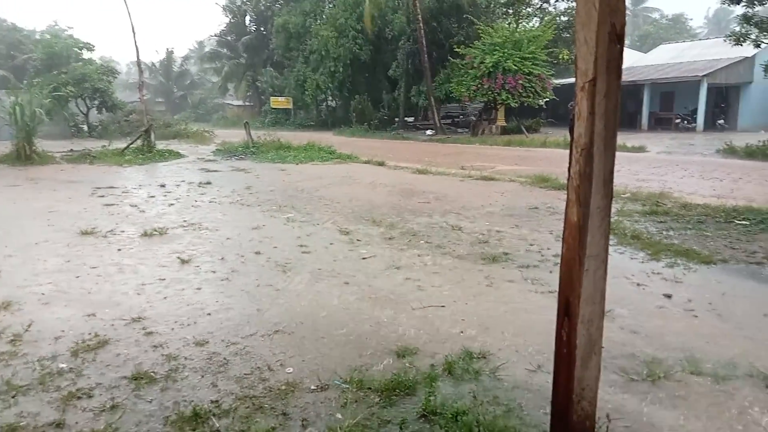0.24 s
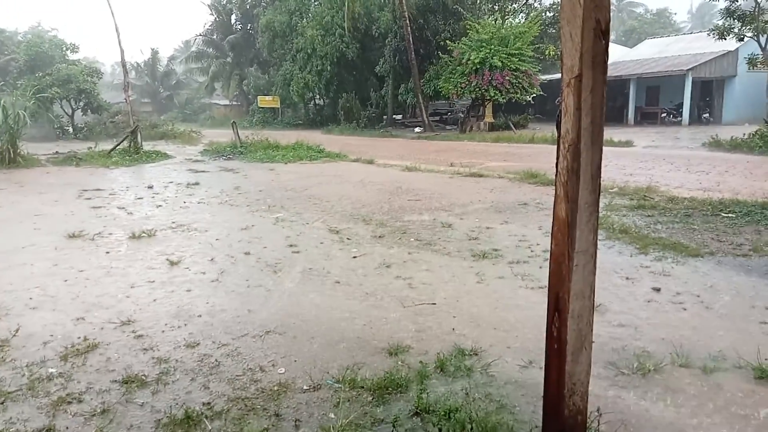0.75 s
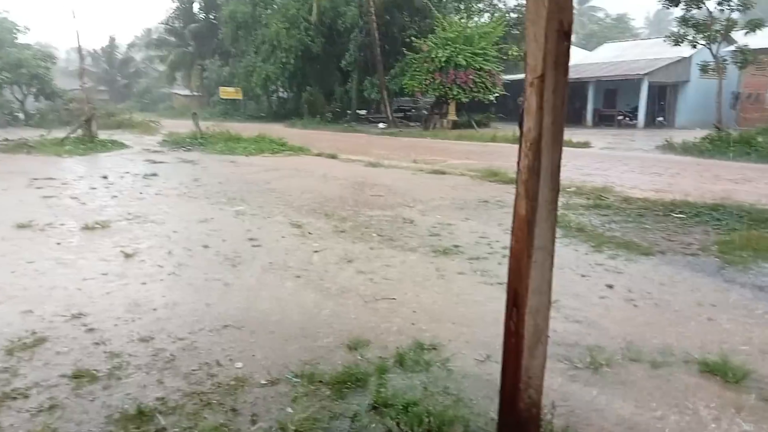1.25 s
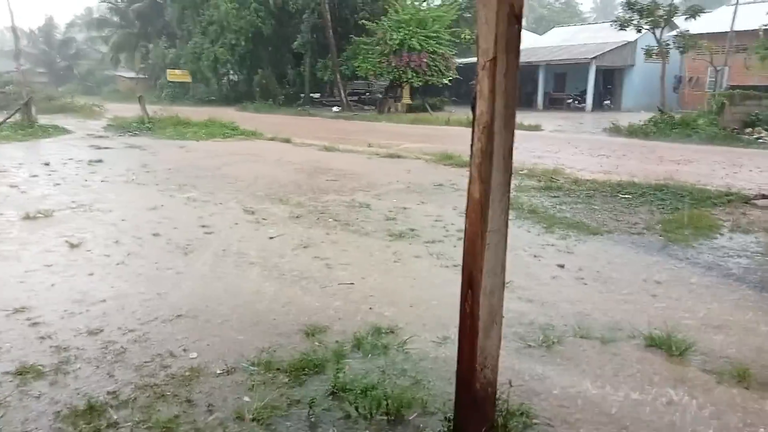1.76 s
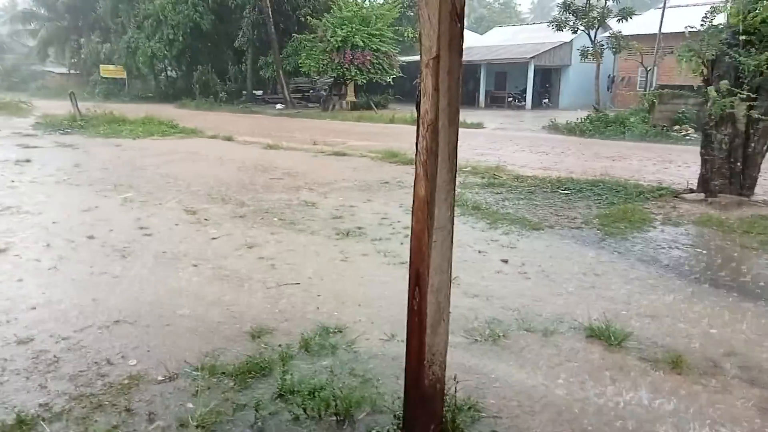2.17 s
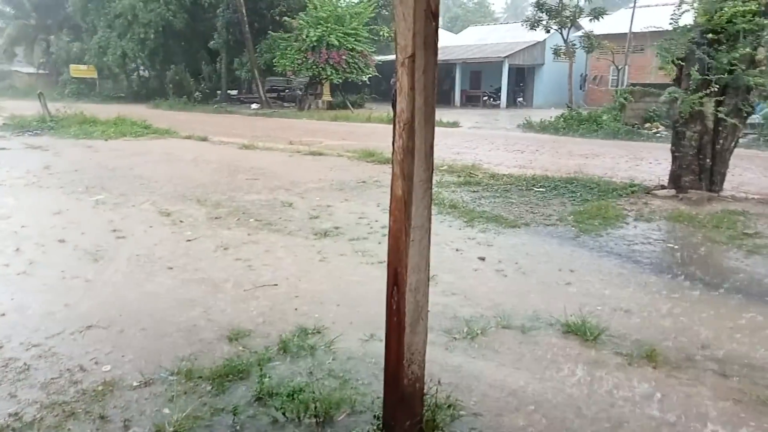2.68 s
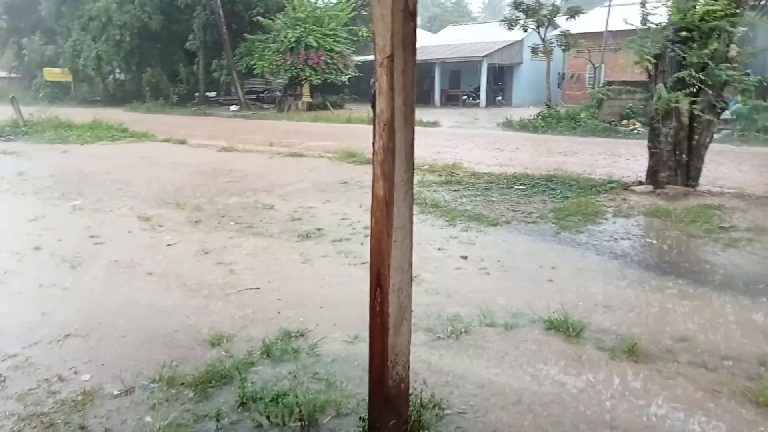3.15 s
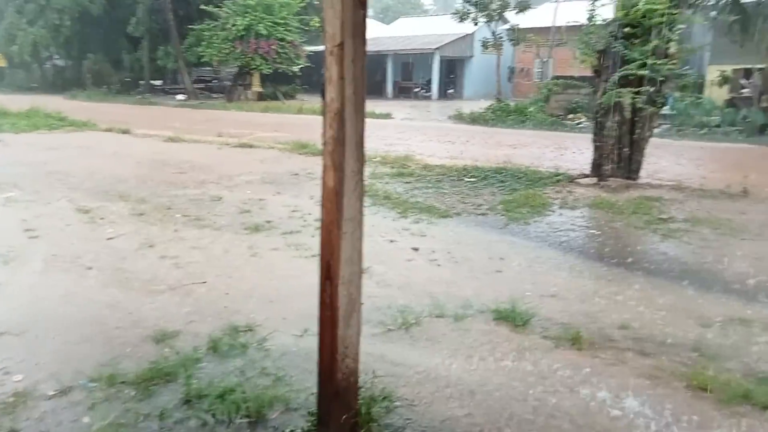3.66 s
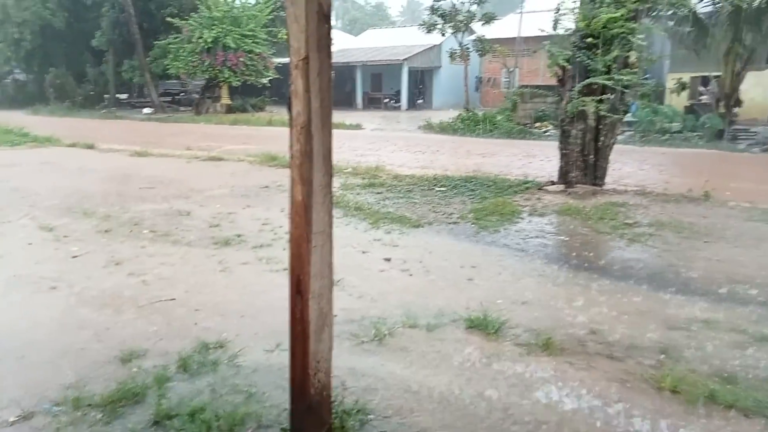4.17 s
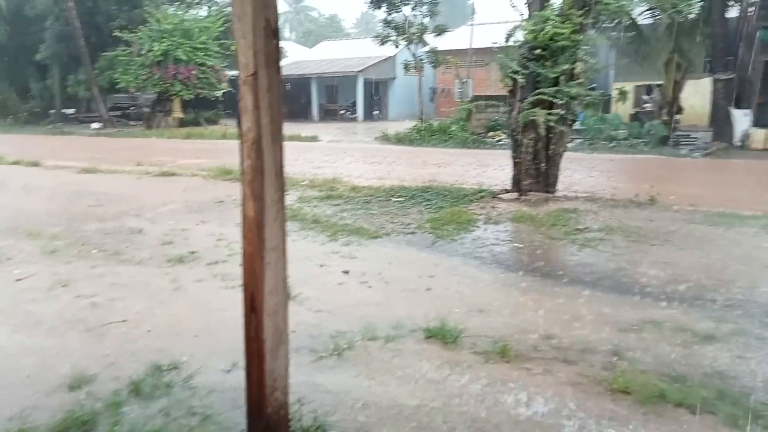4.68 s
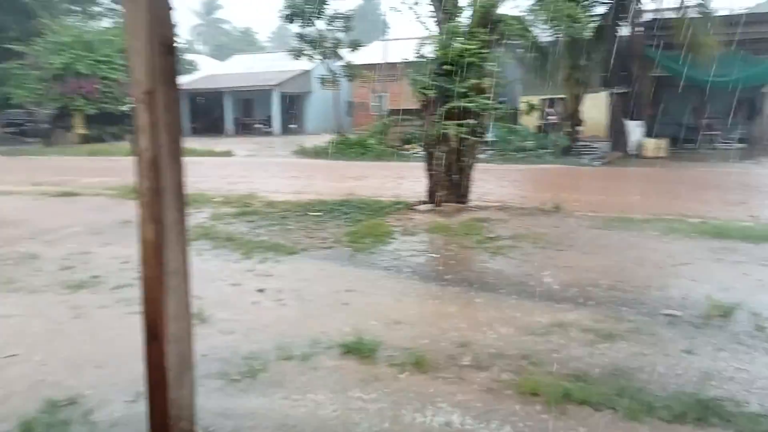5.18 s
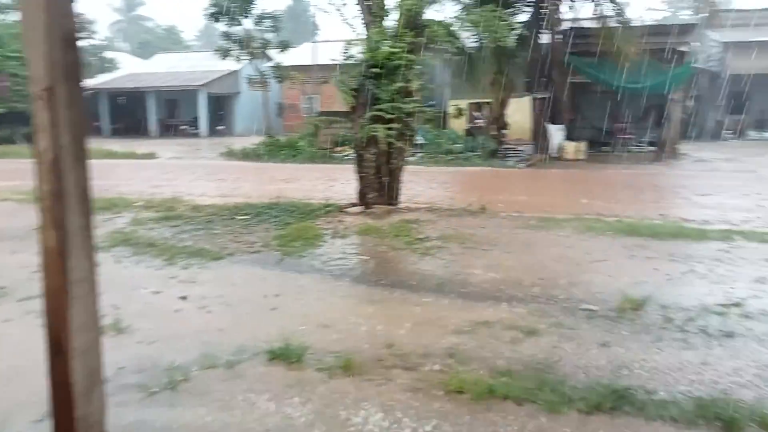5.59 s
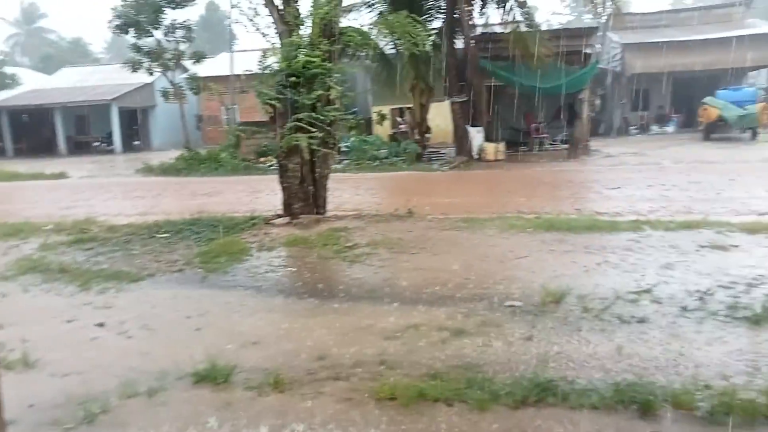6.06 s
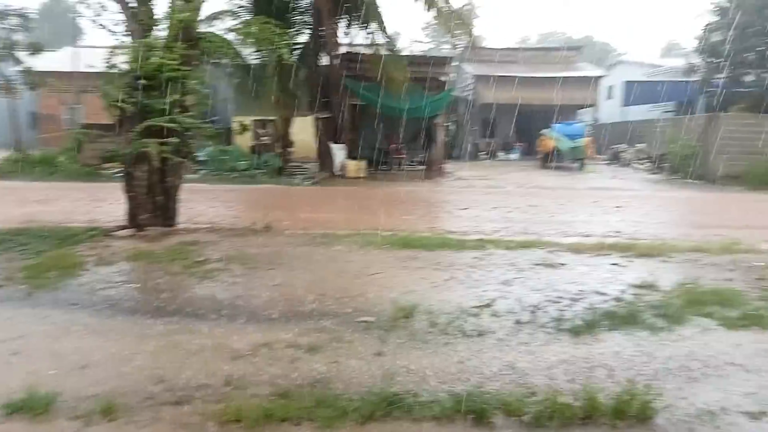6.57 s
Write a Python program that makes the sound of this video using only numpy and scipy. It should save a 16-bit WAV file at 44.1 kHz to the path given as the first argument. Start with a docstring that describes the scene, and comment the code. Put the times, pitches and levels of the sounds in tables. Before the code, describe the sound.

Heavy rain beats on a sheet porch roof and a flooded muddy yard, a dense bright hiss with roof drumming and tiny puddle plinks. A gust builds in the first second and a half, thumping the small microphone with low puffs, then fades. The rain ebbs, swells mildly around four seconds and ebbs again, with sharp runoff splashes close by.

```python
"""Heavy rain under a porch roof, one microphone feeding both channels: drops beat on the sheet roof and
the flooded yard as clicks, noise and ringing bubbles. The rain swells with a gust that buffets the small
microphone with low thumps, swells of low noise; the level dips briefly at its height. Runoff splashes
close by in short bright sprays. As the gust dies the rain ebbs, then swells and ebbs once more, with
weaker low puffs of wind late on."""
import sys
import numpy as np
from scipy import signal
from scipy.fft import rfft, irfft, next_fast_len
from scipy.io import wavfile

SR = 44100
rng = np.random.default_rng(int(sys.argv[2]) if len(sys.argv) > 2 else 0)


def digitize_waveform(pressure):
    """Quantize a signal to 16-bit integers and store it at the path in sys.argv[1].

    Rows of a 2-D input are taken as channels; values are limited to [-1, 1].
    """
    field = np.atleast_2d(pressure).T
    bounded = np.clip(field, -1, 1)
    quanta = np.round(bounded * 32767).astype(np.int16)
    wavfile.write(sys.argv[1], SR, quanta)


N = 301203
SIZE = next_fast_len(N)   # transform length in samples

# Resonances of the microphone port. Each row: centre in Hz, width in Hz, lift in dB.
PORT_PEAKS = [(6675, 1660, 14.5), (12800, 2130, 6)]


def from_db(db):
    """Amplitude ratio of a level in dB."""
    return 10 ** (np.asarray(db) / 20)


def rms_one(x):
    """Scale x to an rms of 1."""
    return x / np.sqrt(np.mean(x ** 2) + 1e-20)


def in_time(rows):
    """Each column after the time in seconds, drawn as straight lines over the whole take."""
    seconds, *columns = np.transpose(rows)
    return [np.interp(np.arange(N) / SR, seconds, column) for column in columns]


def coloured(x, colour, peaks=()):
    """Spectrum of x shaped by a (Hz, dB) table and bell-shaped lifts, and its log frequencies."""
    hz = np.arange(SIZE // 2 + 1) * SR / SIZE + 1   # 1 Hz up, so that the log exists
    at, db = np.transpose(colour)
    shape_db = np.interp(np.log(hz), np.log(at), db)
    lift = sum(lift_db * np.exp(-2 * ((hz - centre) / width) ** 2) for centre, width, lift_db in peaks)
    return rfft(x, SIZE) * from_db(shape_db + lift), np.log(hz)


def drift(corner_hz):
    """Slow chance: noise twice through a one-pole low-pass, run in; rms 1."""
    step = 40   # samples between slow values
    r = np.exp(-2 * np.pi * step * corner_hz / SR)
    noise = rng.standard_normal(N // step + 2002)
    slow = signal.lfilter([1], [1, -2 * r, r * r], noise)[2000:]
    return np.interp(np.arange(N) / step, np.arange(len(slow)), rms_one(slow))


def clicks(per_s, spread_db):
    """Clicks of either sign at random moments; a few are bigger than the rest."""
    excess_db = spread_db * np.minimum(rng.exponential(1, N), 4)
    sizes = from_db(excess_db) * rng.choice([-1, 1], N)
    return sizes * (rng.random(N) < per_s / SR)


def wind():
    """Lumpy low noise from air that flows over the port."""
    # Wind pressure on the microphone. Each row: time in seconds, level in dB before the lumps and vent.
    wind_levels = [(0.0, -40.5), (.3, -38), (.95, -34.5), (1.27, -36), (1.52, -27), (2.0, -38), (2.6, -36),
                   (2.95, -38), (3.3, -57), (3.95, -52), (4.85, -57), (5.1, -50), (5.5, -53), (5.75, -42),
                   (5.95, -53), (6.83, -52)]
    # Spectrum of the flow. Each row: frequency in Hz, relative level in dB per Hz.
    wind_colour = [(15, -57), (25, -23), (71, 0.5), (141, -0.5), (215, -8), (370, -6.5), (480, -26),
                   (620, -30), (1060, -120)]
    (wind_db,) = in_time(wind_levels)
    lumps_db = 2.5 * drift(12)
    spectrum, _ = coloured(rng.standard_normal(N), wind_colour)
    flow = rms_one(irfft(spectrum, SIZE)[:N])
    return from_db(wind_db + lumps_db) * flow


def buffets():
    """Each eddy striking the port is a swell of noise around a pitch set by its length."""
    # Strong eddies. Each row: time of the top in seconds, rms level there in dB before the vent,
    # length in seconds from the top until the swell has fallen to exp(-2).
    eddies = [(0.428, -22.5, 0.032), (0.588, -24, 0.067), (0.706, -20, 0.015), (0.771, -24, 0.022),
              (0.9, -27.5, 0.055), (1.089, -26, 0.043), (1.246, -24, 0.028), (1.304, -22.5, 0.049),
              (1.364, -22, 0.016), (1.404, -19, 0.028), (1.438, -23, 0.012), (1.475, -15.5, 0.013),
              (1.499, -14.5, 0.015), (1.518, -16.5, 0.017), (1.545, -20, 0.017), (1.586, -13, 0.026),
              (1.679, -18.5, 0.018), (1.726, -17, 0.016), (1.876, -28.5, 0.041), (1.972, -23.5, 0.043),
              (2.092, -29.5, 0.036), (2.303, -27, .012), (2.334, -26, 0.037), (2.647, -25, 0.02),
              (2.972, -33.5, .038), (6.333, -37, .057)]
    pitch_hz, pitch_length_s = 149, 0.023   # an eddy of this length has this pitch
    slope = 0.26   # shorter eddies sound higher by this power
    t = np.arange(-3000, 3000) / SR
    out = np.zeros(N)
    for (s, db, length), noise in zip(eddies, rng.standard_normal((len(eddies), len(t)))):
        hz = pitch_hz * (pitch_length_s / length) ** slope
        band = signal.butter(2, [hz * 0.6, hz * 1.475], "band", fs=SR, output="sos")
        swell = np.exp(-2 * (t / length) ** 2)
        puff = swell * signal.sosfilt(band, noise)
        puff *= np.sqrt(np.sum(swell ** 2) / np.sum(puff ** 2))   # as strong as its swell
        start = round(s * SR) - len(t) // 2
        out[start:start + len(t)] += from_db(db) * puff
    return out


def splashes():
    """Short bright sprays of noise that start sharply and die fast; small ones come at random."""
    # Loudest runoff nearby. Each row: start in seconds, starting rms level in dB ahead of the port.
    loud_splashes = [(1.3179, -27), (1.4207, -23), (1.514, -30), (3.9315, -26), (4.1869, -35),
                     (4.2527, -31), (4.4218, -32), (4.8698, -29), (5.233, -32)]
    small_per_s, small_db, small_spread_db = 3.0, -39, 2.5   # the weakest small ones start at small_db
    strikes = from_db(small_db) * np.abs(clicks(small_per_s, small_spread_db))
    for s, db in loud_splashes:
        strikes[round(s * SR)] = from_db(db)
    r = from_db(-60 / (.06 * SR))   # falls 60 dB in 0.06 s
    fading = signal.lfilter([1], [1, -r], strikes + 1e-18)
    band = signal.butter(2, [7500, 15000], "band", fs=SR, output="sos")
    spray = signal.sosfilt(band, rng.standard_normal(N))
    return fading * rms_one(spray)


def plinks():
    """Drops into puddles trap bubbles that ring for some cycles at scattered pitches."""
    per_s, ring_cycles = 1200, 90   # a ring falls 60 dB in this many cycles
    struck = clicks(per_s, 3.5)
    pitches_hz = np.geomspace(500, 3500, 70)
    dealt = rng.integers(0, len(pitches_hz), N)   # which pitch each strike rings
    out = np.zeros(N)
    for k, hz in enumerate(pitches_hz):
        r = from_db(-60 * hz / (ring_cycles * SR))
        w = 2 * np.pi * hz / SR
        mine = struck * (dealt == k) + 1e-18
        out += signal.lfilter([1 - r, 0, r - 1], [1, -2 * r * np.cos(w), r * r], mine)
    return rms_one(out)


def drops():
    """Impacts as dense clicks, the wash of far rain as noise, and the ringing bubbles."""
    drops_per_s, spread_db = 28000, 1.2
    plink_db = -16   # bubbles against impacts and wash
    impacts = clicks(drops_per_s, spread_db) + 0.88 * rng.standard_normal(N)
    return rms_one(impacts) + from_db(plink_db) * plinks()


def rain(surge_db, patch_db, treble_db):
    """Overlapping bands of drops: all but the roof's surge together, each is patchy, the treble flickers most."""
    # The downpour. Each row: time in seconds, level in dB behind the port, before the bands' own shifts.
    rain_levels = [(0.0, -20.5), (.6, -18), (1.56, -15.5), (1.63, -17), (1.68, -14.5), (1.84, -16.5),
                   (1.92, -14.5), (2.07, -17), (2.2, -16), (2.5, -18.5), (2.62, -17.5), (3.3, -20),
                   (3.88, -19.5), (3.96, -18), (4.13, -19), (4.7, -18.5), (6.2, -21), (6.5, -23),
                   (6.83, -21)]
    # Spectrum of the drops. Each row: frequency in Hz, relative level in dB per Hz.
    rain_colour = [(20, -40), (45, -43), (90, -33), (160, -11.5), (480, -11.5), (800, -10), (1500, -3.5),
                   (3000, -3.5), (5300, -9.5), (8800, -17.5), (10500, -20.5), (15700, -20.5)]
    # Resonances of the sheet roof. Each row: centre in Hz, width in Hz, lift in dB.
    roof_peaks = [(634, 130, 4.5), (1664, 110, 2), (2300, 460, 1.5), (4610, 1030, 4)]
    # Balance of near and overhead. Each row: time in seconds, treble lift in dB, roof drumming lift in dB.
    balance = [(0, 2.5, 1.5), (.7, 2.5, 1), (1.3, 1, -0.5), (2.2, 2.3, -.5), (3.5, 1.2, 1), (4.6, 1, 1),
               (5.8, 1, 0.8), (6.83, 1, 3.5)]
    roof_hz, splash_hz = 990, 7400   # below: the roof drums; above: near splashes
    yard_hz = 2260   # centre of the patter on standing water
    (rain_db,), (splash_db, roof_db) = in_time(rain_levels), in_time(balance)
    swing_db = rain_db - rain_db.mean()
    yard_db = 1.0 - 0.22 * swing_db   # the patter swings less than the rest
    fall = drops()
    spectrum, log_hz = coloured(fall, rain_colour, roof_peaks)
    # the port's lifts count in the level here, but sound only in record()
    heard, _ = coloured(fall, rain_colour, [*roof_peaks, *PORT_PEAKS])
    scale = np.sqrt(np.mean(irfft(heard, SIZE) ** 2))
    surge, flicker = drift(13), drift(12)
    centres = np.log(np.geomspace(150, 13000, 11))
    out = np.zeros(N)
    for k, centre in enumerate(centres):
        weight = np.interp(log_hz, centres, np.arange(len(centres)) == k)   # triangle over log frequency
        band = irfft(spectrum * weight, SIZE)[:N]
        near = 1 / (1 + (splash_hz / np.exp(centre)) ** 6)
        roof = 1 / (1 + (np.exp(centre) / roof_hz) ** 4)
        yard = np.exp(-2 * (centre - np.log(yard_hz)) ** 2)
        shift = yard * yard_db + near * splash_db + roof * roof_db
        together = (1 - roof) * surge_db * surge
        patchy = (patch_db + 0.52 * near) * drift(12.4)
        chance = together + patchy + near * treble_db * flicker
        out += band * from_db(shift + chance)
    return from_db(rain_db) * out / scale


def scene():
    """Everything reaches one microphone; its vent lets the slowest wind pressure escape."""
    vent = signal.butter(2, 58, "high", fs=SR, output="sos")
    gust = signal.sosfilt(vent, wind() + buffets())
    shower = rain(surge_db=.4, patch_db=.5, treble_db=.8)
    return np.array([shower + splashes() + gust] * 2)


def record(dry):
    """The narrow port resonates; the top is cut steeply."""
    flat = [(20, 0), (20000, 0)]
    spectrum, _ = coloured(dry, flat, PORT_PEAKS)
    ported = irfft(spectrum, SIZE)[:, :N]
    top_cut = signal.ellip(16, .3, 85, 15500, fs=SR, output="sos")   # cutoff 15500 Hz
    return signal.sosfilt(top_cut, ported)


dry = scene()
out = record(dry)
digitize_waveform(out)
```